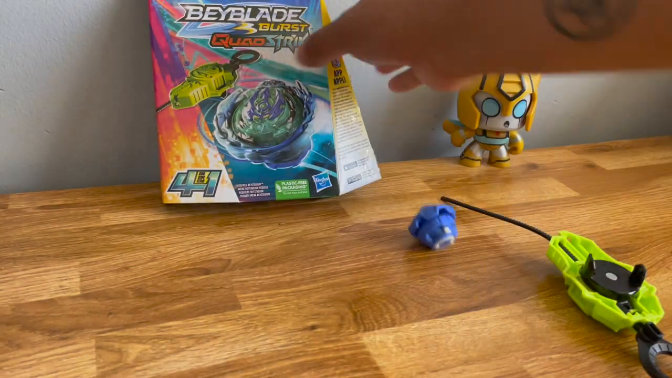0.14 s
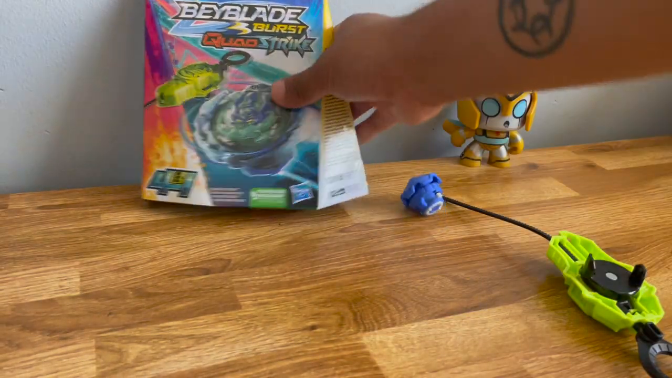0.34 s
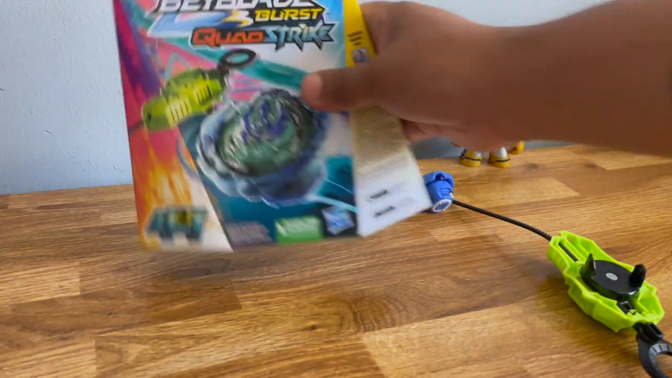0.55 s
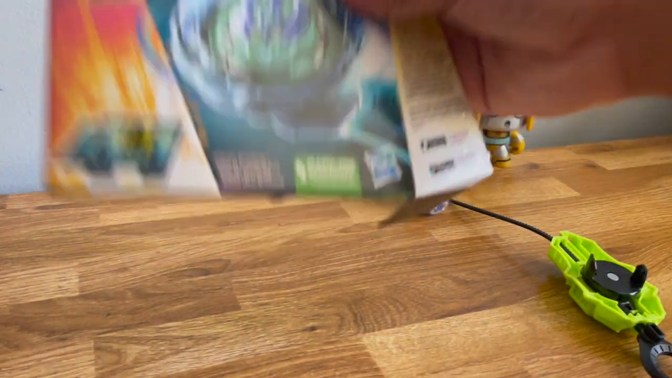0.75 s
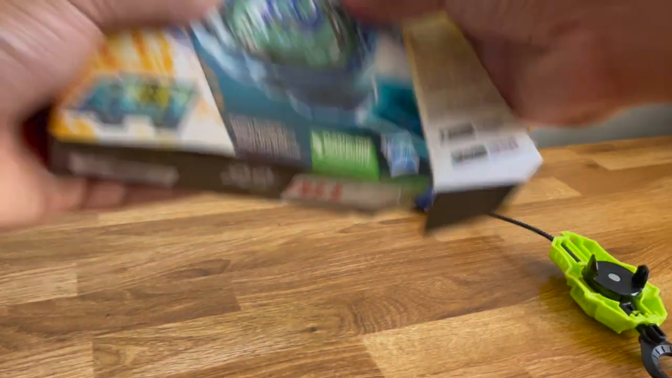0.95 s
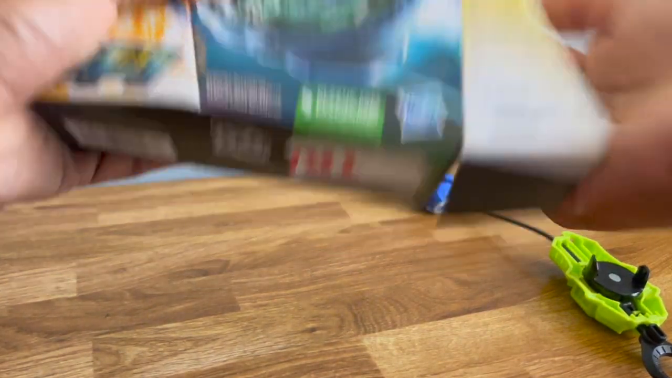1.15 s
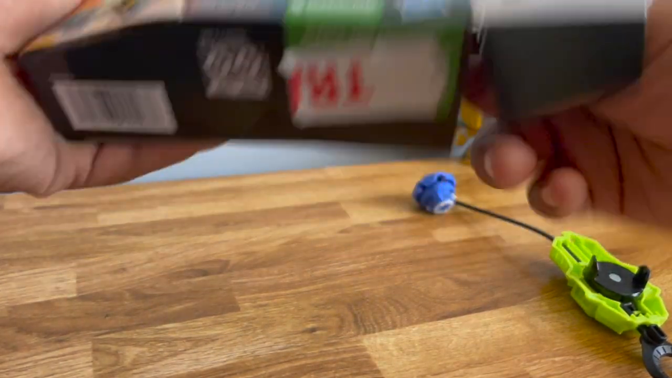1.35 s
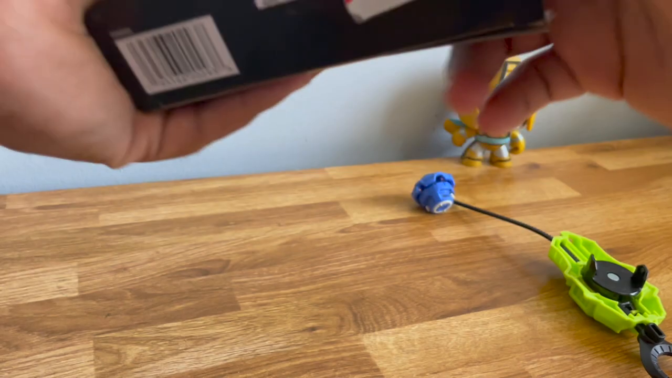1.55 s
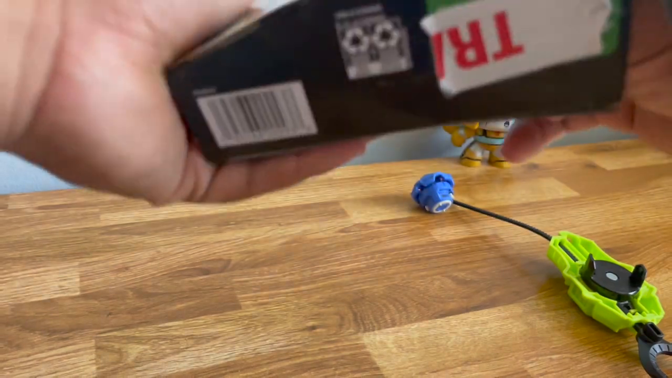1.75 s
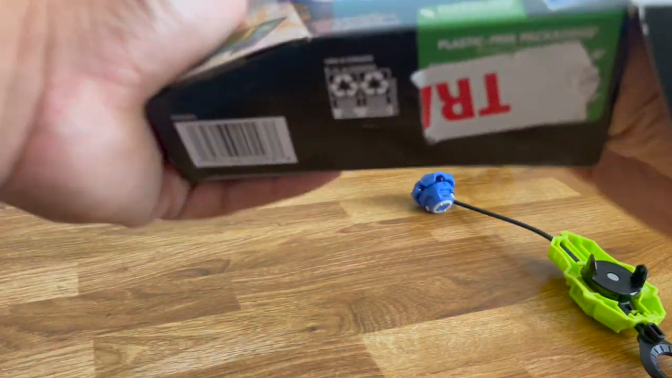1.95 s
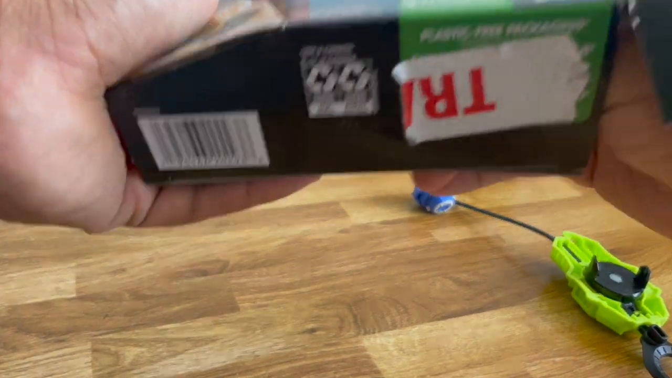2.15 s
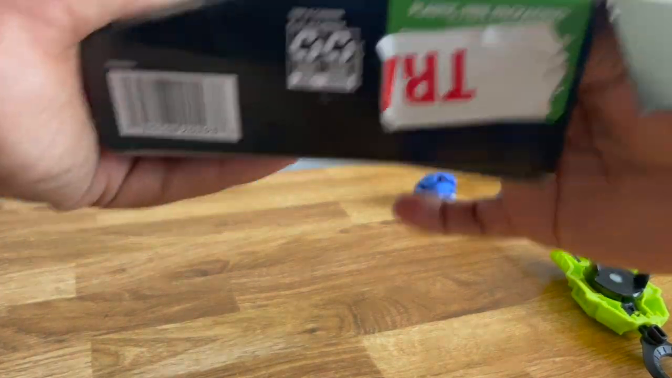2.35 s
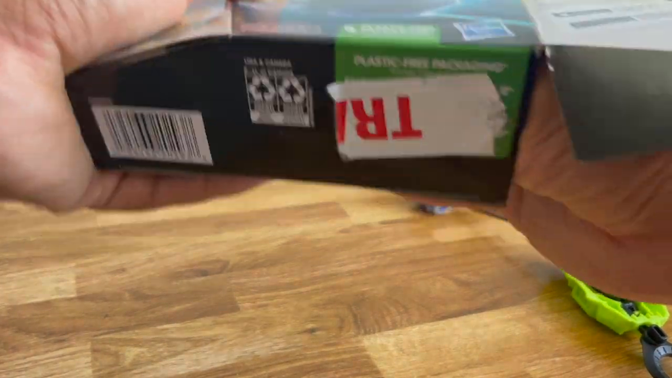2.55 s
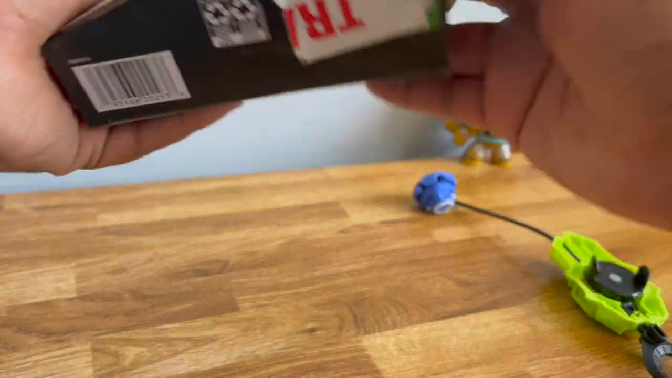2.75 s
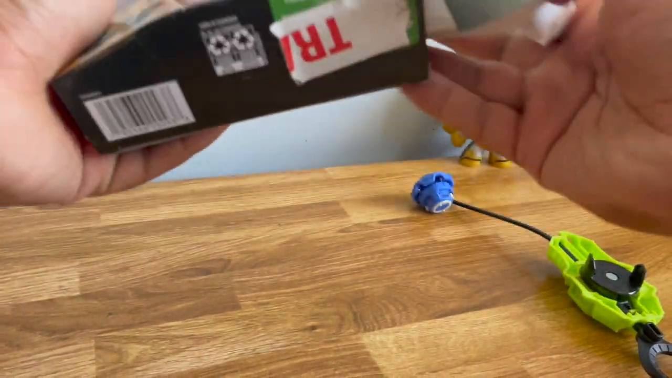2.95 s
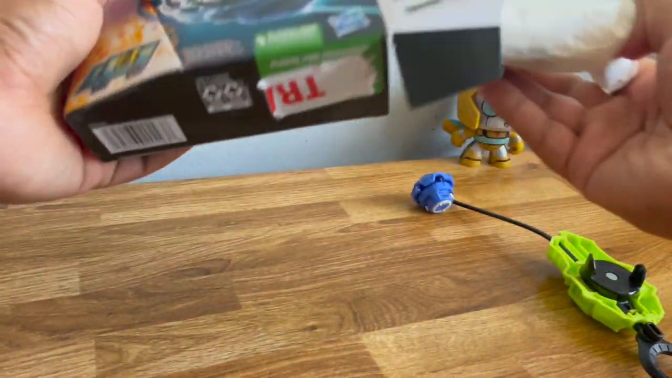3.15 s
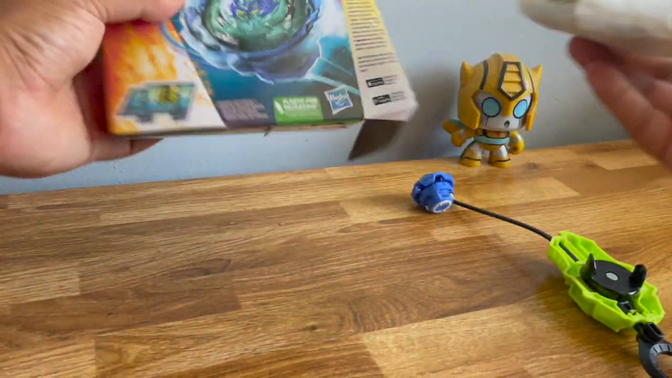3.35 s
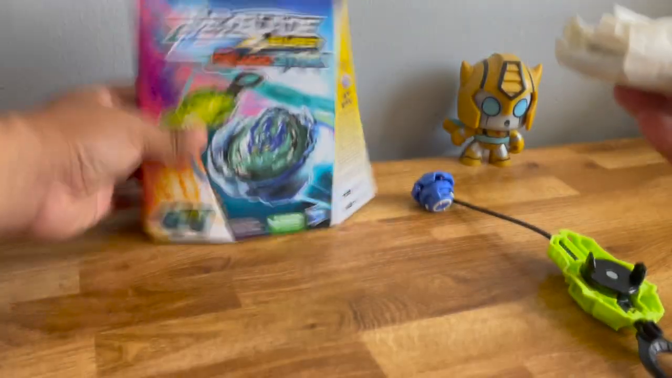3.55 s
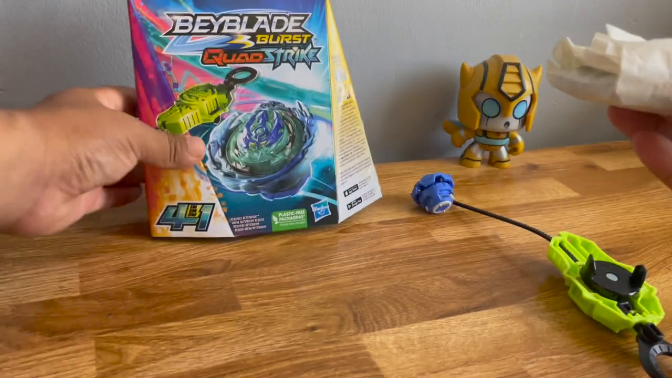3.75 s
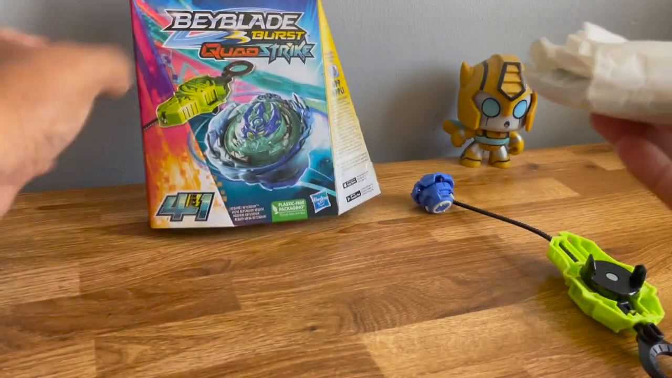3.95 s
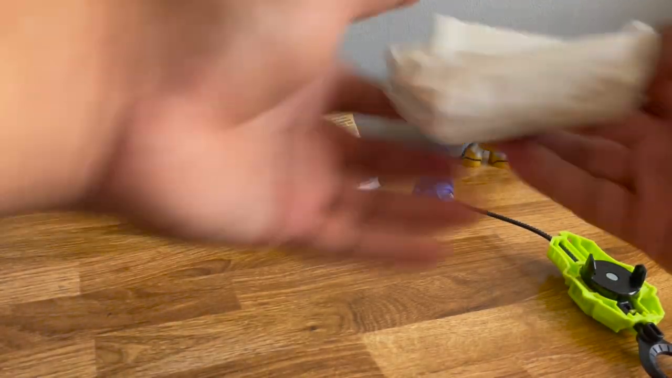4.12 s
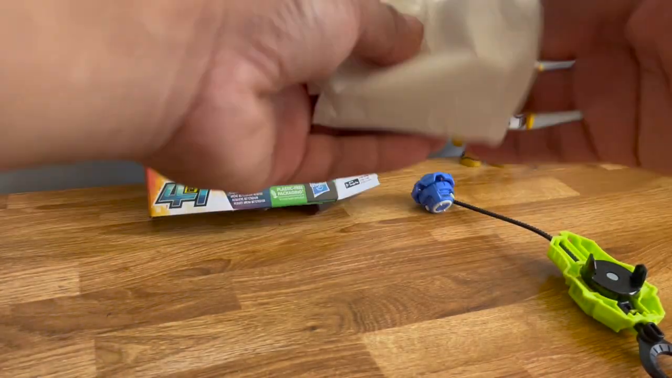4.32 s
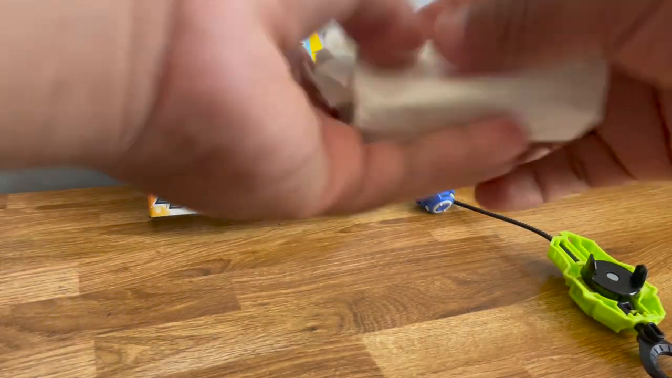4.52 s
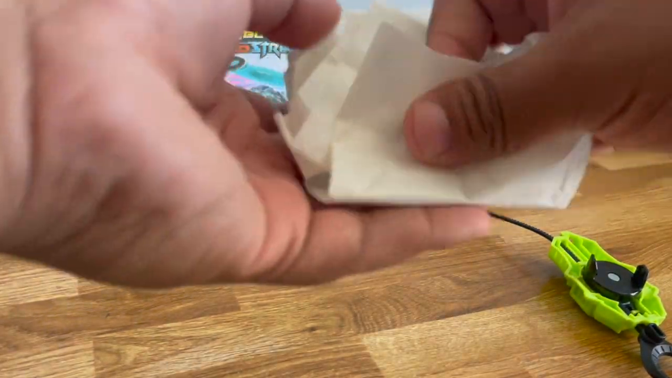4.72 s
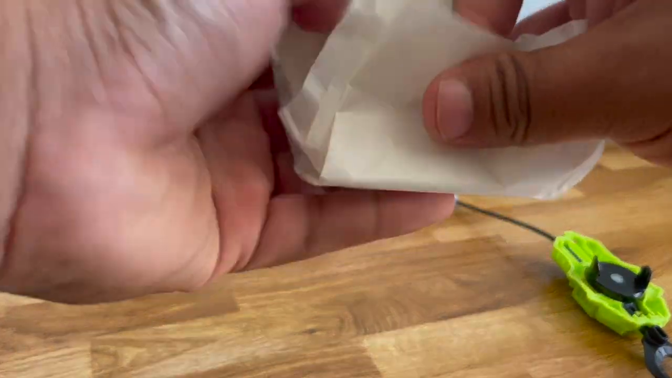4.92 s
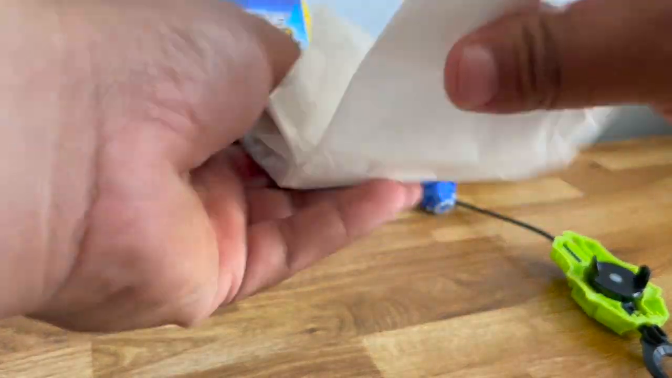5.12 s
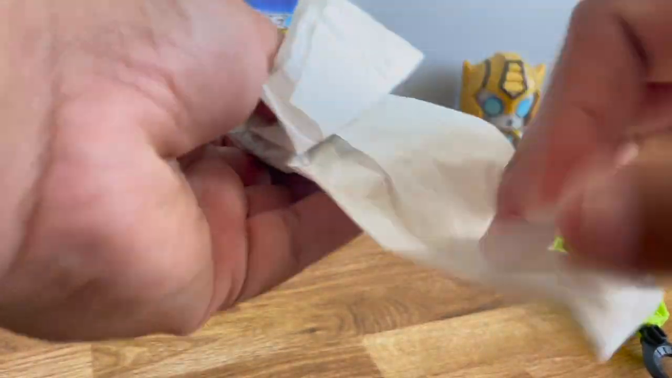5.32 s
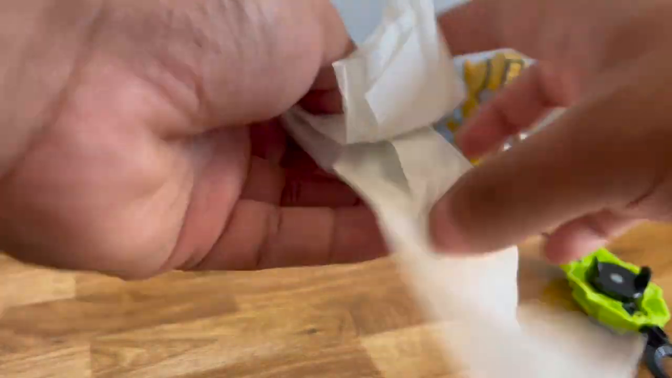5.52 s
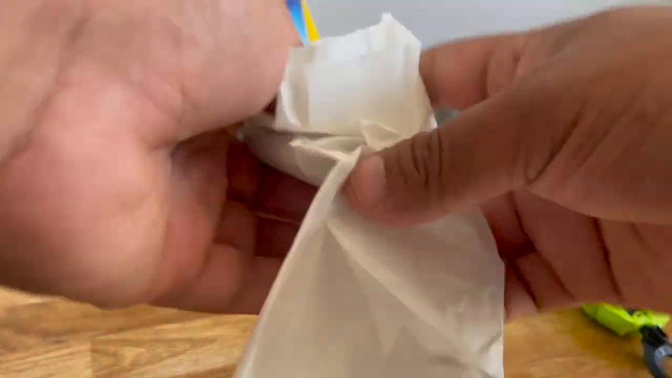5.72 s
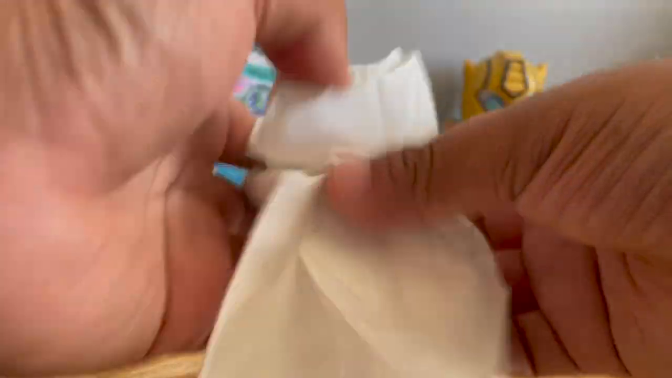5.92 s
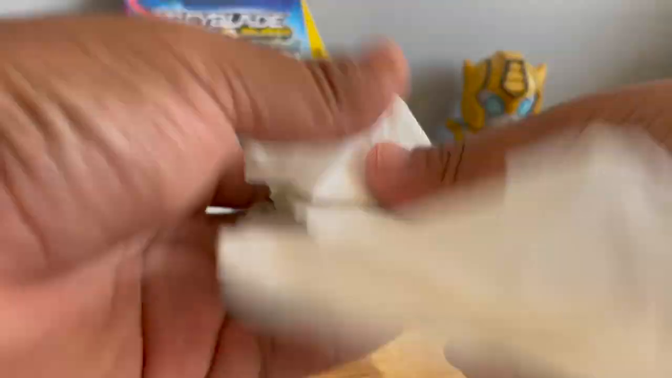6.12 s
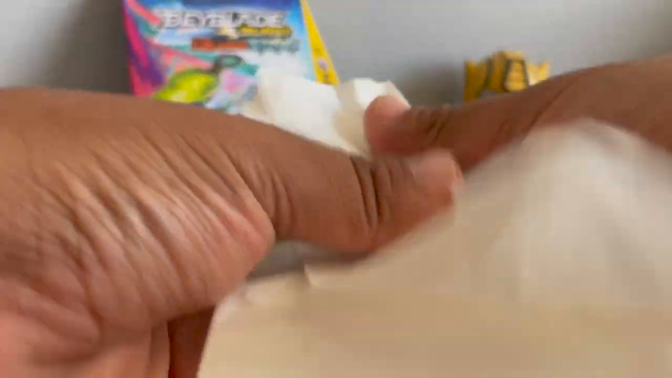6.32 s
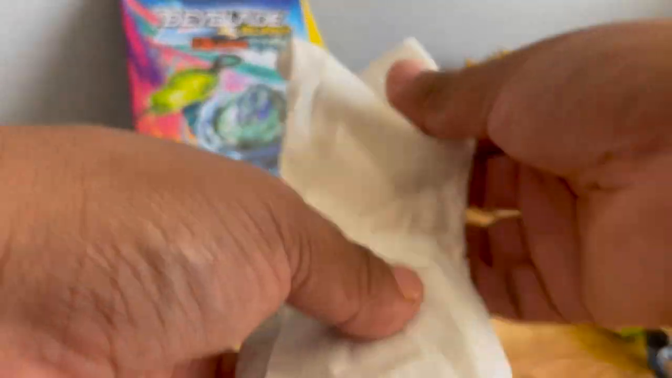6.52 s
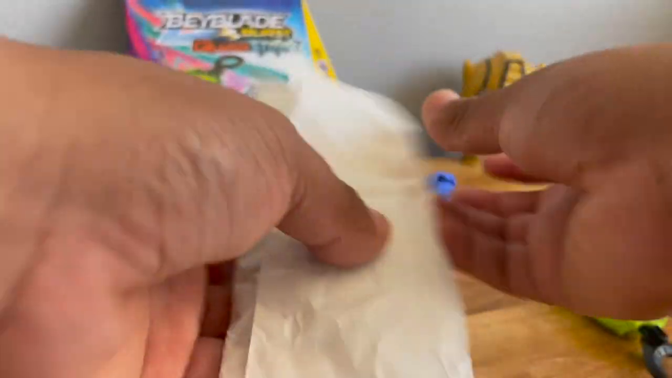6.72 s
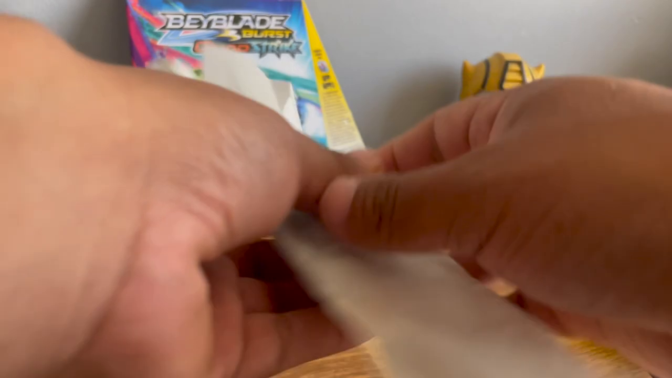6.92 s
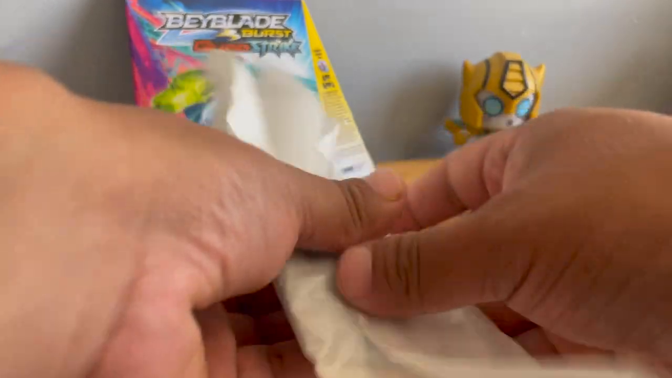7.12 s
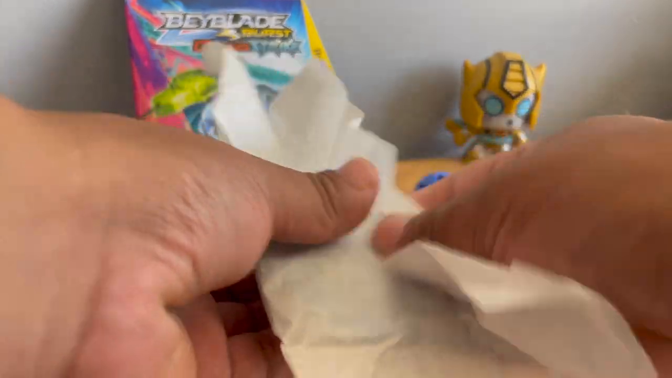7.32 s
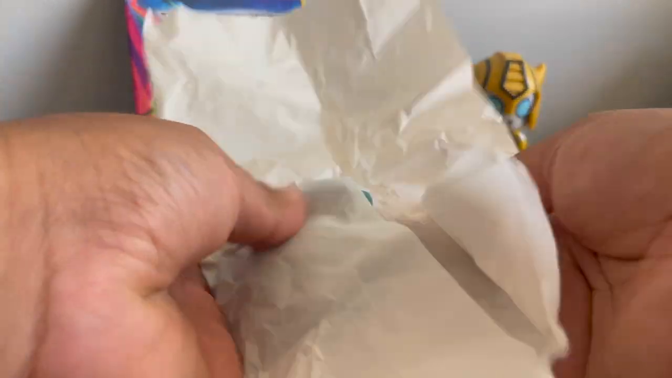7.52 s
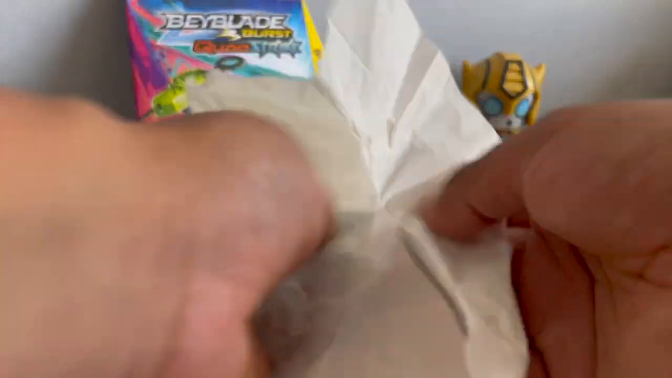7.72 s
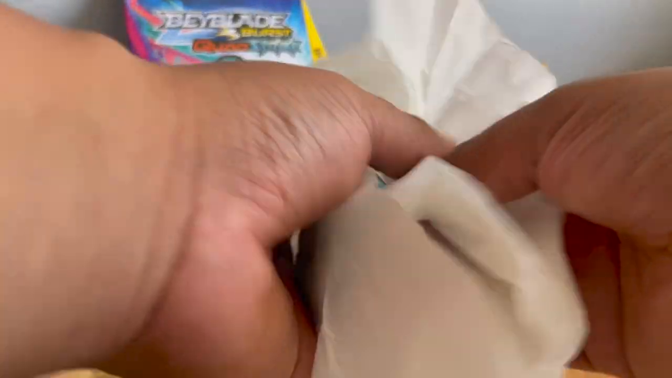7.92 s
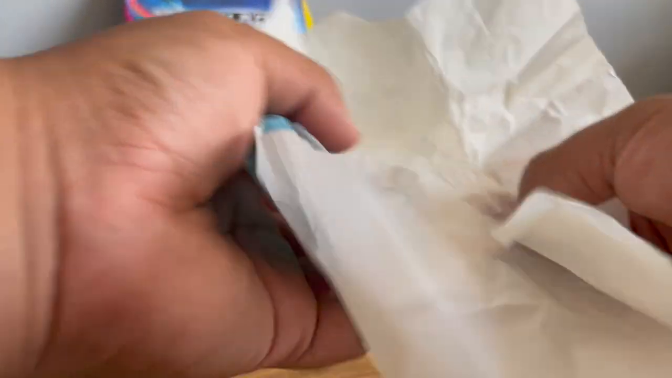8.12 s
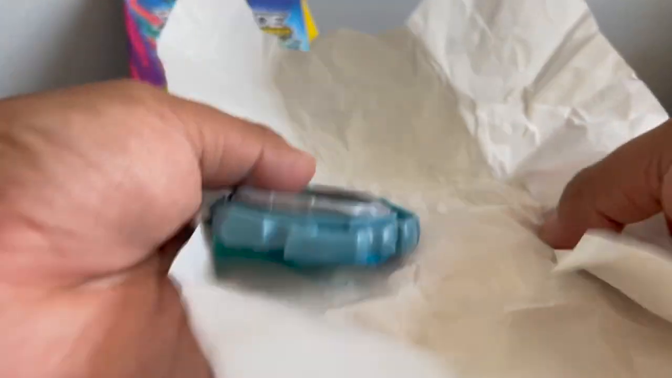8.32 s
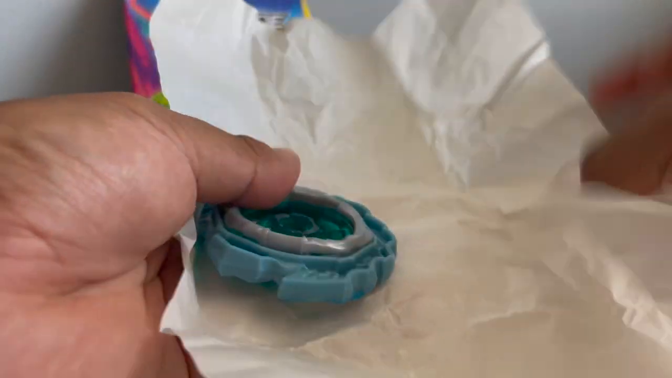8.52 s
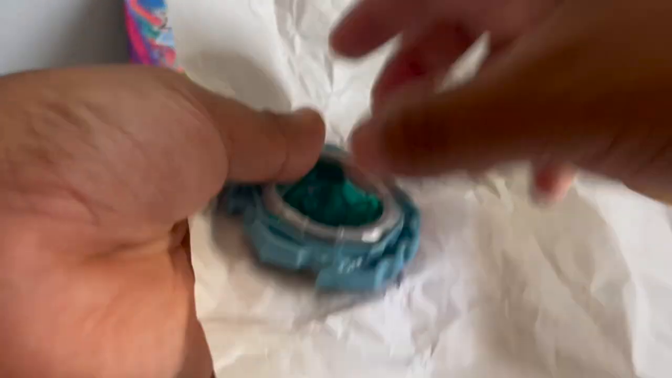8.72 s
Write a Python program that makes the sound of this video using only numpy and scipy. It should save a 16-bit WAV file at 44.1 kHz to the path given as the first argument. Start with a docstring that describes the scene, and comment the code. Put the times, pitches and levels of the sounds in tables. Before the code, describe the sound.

A light plastic rattle with a few bumps dies away, followed by boxy knocks and papery scuffing as a cardboard box is lifted and emptied. The box lands softly on the table. Then tissue paper is opened right by the stereo phone microphone: bright crackles, sharp snaps and soft low flaps, loudest past the middle of the unwrapping. The room is small and dry, with gaps falling almost silent.

```python
"""Close to a phone in a small room a plastic top wobbles to rest; then hands lift a cardboard box, shake out
a parcel, set the box down on a wooden table and unwrap tissue paper. Buckling creases are random impulses
that excite narrow bands over a noise rub; loud snaps are filtered clicks, knocks are decaying modes under a
rattle, flaps are damped low sines. Two microphone ports colour left and right over a faint room tone, and
the phone's gate turns faint sound down further."""
import sys
import numpy as np
from scipy import signal
from scipy.fft import rfft, irfft, next_fast_len
from scipy.io import wavfile
from scipy.ndimage import uniform_filter1d

SR = 44100
rng = np.random.default_rng(int(sys.argv[2]) if len(sys.argv) > 2 else 0)


def wav_out(sig):
    """Save sig, one row per channel (or a flat mono array), as 16-bit PCM at SR to the path in sys.argv[1]."""
    wavfile.write(sys.argv[1], SR, np.round(np.clip(np.atleast_2d(sig).T, -1, 1) * 32767).astype(np.int16))


def makeup_ratio(level_db):
    """Linear amplitude ratio for a level in decibels (20 dB per factor of ten)."""
    decades = np.asarray(level_db, float) / 20
    return 10 ** decades


N = 390726

# time in which the open box is held: start_s, end_s
BOX_HELD_S = (.84, 3.12)
# delay of a crease's reflection off a hand, fold or the table: shortest_s, longest_s
BOUNCE_S = (.0003, .0013)
BOUNCE = 0.7  # amplitude share of that reflection


def evened(x):
    """Normalization: scales a signal to rms 1."""
    return x / np.sqrt(np.mean(x ** 2) + 1e-20)


def read(points, hz):
    """Logarithmic frequency scale: interpolates a spectrum between its points."""
    f, value = np.transpose(points)
    return np.interp(np.log(hz + 1), np.log(f + 1), value)


def add(mix, s, sound):
    """Superposition: mixes a sound in at time s."""
    part = mix[:, round(s * SR):][:, :sound.shape[1]]
    part += sound[:, :part.shape[1]]


def band(x, hz, spread):
    """Resonance as a band-pass from hz / spread to hz * spread."""
    edges = np.clip([hz / spread, hz * spread], 20, SR / 2 - 500)
    return signal.sosfilt(signal.butter(2, edges, "bandpass", fs=SR, output="sos"), x)


def fade(x, seconds):
    """Exponential decay: every impulse dies away with this time constant."""
    return signal.lfilter([1], [1, -np.exp(-1 / (seconds * SR))], x)


def drift(count, size):
    """Smoothed noise: a random curve of rms 1 that wanders over about size samples."""
    return evened(uniform_filter1d(uniform_filter1d(rng.standard_normal(count), size), size))


def hands(t, fall_db_per_s):
    """Power summation: the moves add up, and the strongest dominates low weight and hollow pitch."""
    # moves of the hands or rolls of the top; levels are relative to the paper's spectrum, and the hollow
    # lies between hands and sheet: start_s, length_s, start_db, end_db, low_weight_db, hollow_hz
    moves = [(0, .28, -39.5, -44.5, -5, 1985), (0.306, 0.13, -43, -48.5, -5, 1420),
             (0.481, 0.015, -57.5, -50, -9, 1880), (0.556, .025, -66, -60, -27, 3100),
             (0.597, 0.024, -42, -61.5, -10, 2990), (0.875, 0.013, -37, -55.5, -19, 1540),
             (0.925, 0.2, -36.5, -63, -8, 1530), (1.055, .19, -42.5, -48, -23, 1300),
             (1.258, 0.024, -46, -57, 7, 1500), (1.283, 0.07, -37.5, -39, -11, 2900),
             (1.332, .19, -40.5, -39, -8.5, 1460), (1.538, 0.071, -51.5, -41, 0, 1490),
             (1.62, 0.1, -31, -48.5, -10.5, 1410), (1.736, 0.04, -51, -43, -14, 1500),
             (1.783, 0.1, -35, -31.5, -17.5, 1400), (1.931, 0.14, -43.5, -48.5, -28, 1490),
             (2.059, 0.15, -32.5, -41, -22, 1390), (2.251, 0.046, -34, -32, -14.5, 1510),
             (2.355, .16, -34, -36.5, -22.5, 1450), (2.577, .22, -37.5, -29.5, -27.5, 1534),
             (2.814, 0.13, -36, -48, -12, 3300), (2.947, 0.12, -30.5, -40.5, -19, 2230),
             (3.15, 0.051, -59, -46, -10.5, 2370), (3.39, 0.19, -59.5, -79, -16.5, 2560),
             (3.571, .12, -37.5, -54.5, 8, 1280), (3.871, 0.07, -62.5, -51, -59, 2190),
             (4.004, 0.14, -55.5, -42.5, -30, 2230), (4.153, 0.2315, -37, -31, -18, 2065),
             (4.425, 0.075, -31, -41, -21, 1970), (4.516, 0.12, -33, -27.5, -23, 1830),
             (4.668, 0.16, -34, -35.5, -25, 1860), (4.867, 0.1, -36.5, -36, -25.5, 1590),
             (5.006, 0.12, -30, -43, -32, 3150), (5.161, 0.08, -34, -37, -11, 2580),
             (5.278, 0.12, -27, -40, -15, 1750), (5.394, 0.13, -40, -34.5, -13, 2880),
             (5.557, 0.1, -31, -36.5, -28, 1770), (5.683, 0.11, -33.5, -29.5, -22, 1630),
             (5.851, 0.23, -34, -29, -31.5, 4380), (6.136, .18, -38, -32, -31.5, 3800),
             (6.392, 0.11, -29, -32, -23, 1440), (6.494, 0.18, -27.5, -31.5, -20, 2640),
             (6.699, 0.09, -38, -53, -32, 1410), (6.815, 0.028, -43.5, -41.5, -37, 4030),
             (6.915, 0.031, -31.5, -30.5, -35, 4500), (7.007, 0.047, -51.5, -31, -30, 2160),
             (7.097, 0.063, -23, -31, -22, 2110), (7.204, 0.13, -32.5, -28, -17.5, 2250),
             (7.358, 0.094, -28.5, -27, -27, 2670), (7.495, 0.12, -28.5, -37, -13.5, 1350),
             (7.669, 0.12, -36.5, -34, -20.5, 1320), (7.799, 0.12, -35.5, -29, -17.5, 2740),
             (7.971, 0.077, -36.5, -49, 0, 1250), (8.111, .11, -41.5, -46, -5, 1380),
             (8.225, 0.022, -45.5, -25.5, -22.5, 3170), (8.301, 0.035, -27, -27.5, -21.5, 3300),
             (8.412, 0.0097, -21, -44, -30.5, 5010), (8.437, 0.03, -42.5, -49, 7, 1400),
             (8.483, 0.045, -42, -47, -20, 5730), (8.522, 0.053, -58, -52, -4, 1420),
             (8.643, 0.024, -34.5, -49.5, -60, 4870), (8.743, 0.064, -47.5, -30.5, -9, 1390),
             (8.801, 0.067, -47.5, -31.5, -23, 1380)]
    rise_db_per_s, still_db = 904, -86
    s, length, start_db, end_db, low_db, hollow_hz = np.transpose(moves)[:, :, None]
    progress = np.clip((t - s) / np.maximum(length, 1e-3), 0, 1)
    db = start_db + (end_db - start_db) * progress
    db = db - rise_db_per_s * np.maximum(s - t, 0)
    db = db - fall_db_per_s * np.maximum(t - s - length, 0)
    power = makeup_ratio(2 * db) + 1e-30
    share = power / power.sum(0)
    level_db = 10 * np.log10(power.sum(0) + makeup_ratio(2 * still_db))
    return level_db, (share * low_db).sum(0), np.exp((share * np.log(hollow_hz)).sum(0))


def crinkle():
    """Impulsive excitation: random buckling creases ping and burst in each band over a steady rub."""
    # spectrum of paper and skin: frequency_hz, level_db
    paper = [(60, -10.5), (130, -13.5), (300, -7), (900, -4), (2000, -11.5), (5000, -9), (8000, -1),
             (11000, -1.5), (14500, -10)]
    # colour the open box adds while it is held: frequency_hz, gain_db
    in_box = [(100, -3), (400, 3.5), (620, 4), (1100, -7.5), (1550, -4.5), (2100, 0), (3000, 0.5),
              (6000, -2.5), (12000, -2.5)]
    # treble level against the move, fully applied from 11 kHz up: time_s, gain_db
    treble = [(0, -6.5), (.4, -22), (.6, -28), (.9, -11.5), (1.7, -12.5), (2.2, -11), (2.75, -4),
              (3.2, -15), (3.3, -33), (3.6, -24.5), (3.95, -30), (4.2, -8), (5.9, -7), (6.5, -8.5),
              (6.85, -13.5), (7.2, -7), (8.1, -9.5), (8.86, -7.5)]
    # anchors of lows, low middle, middle, upper middle and treble: frequency_hz
    parts_hz = [250, 900, 2000, 5500, 11000]
    creases_per_s, size_db, drift_db = 350, 4.5, -0.5
    card_softness = 0.7  # contacts of top and cardboard differ less in size than tissue
    colour_db, burst_focus_db, ping_focus_db = 5, 7, 18  # focus is the loss at one octave off
    ping_db, rub_db, fold_spread_db = 1, -2.5, 2.5
    faint_db, narrowing = -45.5, 0.58  # each dB under faint_db costs this many dB away from the hollow
    echo_db, echo_orders = 4, 2.6  # a near surface lifts multiples of the hollow pitch, dips between

    t = np.arange(N) / SR
    s = np.arange(0, N / SR + .004, .004)  # control times
    effort_db, _, hollow_hz = hands(s, fall_db_per_s=543.5)
    linger_db, low_db, _ = hands(s, fall_db_per_s=300)  # the lows outlast the rest
    thump_db = low_db + linger_db - effort_db
    level = 0 * s
    parts_db = np.array([thump_db, 0.45 * thump_db, level, level, np.interp(s, *np.transpose(treble))])
    faint_loss_db = narrowing * np.clip(faint_db - effort_db, 0, 25)

    wander_db = drift_db * drift(count=N, size=400)
    size = np.minimum(rng.exponential(1, N), 2.4)
    softness = np.where(t < BOX_HELD_S[1], card_softness, 1)
    creases = (rng.random(N) < creases_per_s / SR) * makeup_ratio((size_db * size + wander_db) * softness)
    at = np.flatnonzero(creases)
    # long creases sound low, short ones high
    centre_hz = 2500 * 2 ** (1.57 * rng.standard_normal(len(at)))
    flips = rng.choice([-1., 1.], (2, len(at)))
    delay = (rng.uniform(*BOUNCE_S, len(at)) * SR).astype(int)
    again = np.minimum(at + delay, N - 1)
    rub = makeup_ratio(rub_db + 0.99 * wander_db)

    out = np.zeros((2, N))
    patches = drift(count=len(s), size=6)
    for hz in np.geomspace(65, 15000, num=32):
        off = np.minimum(np.log2(hz / centre_hz) ** 2, 4.)
        coloured = creases.copy()
        variation = rng.standard_normal(size=8192)[at % 8192]
        coloured[at] *= makeup_ratio(colour_db * variation - burst_focus_db * off)
        burst = evened(fade(coloured, 0.0022 + 0.088 / hz))  # low bands ring longer
        drive = rng.standard_normal((2, N)) * np.hypot(burst, rub)
        pings = creases[at] * makeup_ratio(-ping_focus_db * off)
        pings = makeup_ratio(ping_db) * flips * pings * np.sqrt(N / np.sum(pings ** 2))
        drive[:, at] += pings
        drive[:, again] += BOUNCE * pings
        noise = band(drive, hz, 1.08)

        # folds shift the colour, alike in neighbouring bands
        patches = evened(patches + 0.88 * drift(count=len(s), size=6))
        fold_db = fold_spread_db * (0.48 + 120 / hz) * patches
        weights = [np.interp(np.log(hz), np.log(parts_hz), pick) for pick in np.eye(len(parts_hz))]
        tilt_db = weights @ parts_db
        near = np.exp(-(np.log2(hz / hollow_hz) / 0.45) ** 2)
        hollow_db = -faint_loss_db * (1 - near) * (hz > parts_hz[1])
        order = hz / hollow_hz
        comb_db = echo_db * np.cos(2 * np.pi * order) * np.exp(-(order / echo_orders) ** 4)
        box_db = ((s > BOX_HELD_S[0]) & (s < BOX_HELD_S[1])) * read(in_box, hz)
        gain_db = read(paper, hz) + box_db + effort_db + tilt_db + hollow_db + comb_db + fold_db
        out += evened(noise) * np.interp(t, s, makeup_ratio(gain_db))
    return out


def snap(db, hz):
    """Snap-through buckling: a click and its bounce ring the sheet, with a short crackle after."""
    t = np.arange(1500) / SR
    envelope = np.exp(-t / 0.00045) + 0.13 * np.exp(-t / 0.0039)
    drive = 1.26 * rng.standard_normal((2, len(t))) * envelope
    drive[:, 0] = 3, -3
    drive = drive + BOUNCE * np.roll(drive, round(rng.uniform(*BOUNCE_S) * SR), axis=1)
    crack = makeup_ratio(1.0) * band(drive, 2200, 2.22) + makeup_ratio(-7.0) * band(drive, 7500, 1.26)
    spread = 1.13 + .9 * makeup_ratio(.5 * db)  # harder snaps spread wider
    ring = band(band(drive, hz, spread), hz, spread) + makeup_ratio(0.35 * db - 1.5) * crack
    return makeup_ratio(db) * ring / abs(ring[0]).max()


def crease_snaps(paths):
    """Superposition: adds the loud single snaps of creases."""
    # level is the direct peak ahead of the ports: time_s, level_db, ring_hz
    snaps = [(0.9248, -20, 1660), (1.1164, -28, 1940), (1.2835, -22, 2850), (1.293, -20, 2800),
             (1.5988, -24, 1360), (1.6182, -19, 1190), (1.709, -20, 1390), (1.7888, -22, 1440),
             (1.8123, -22, 1400), (1.8444, -21, 1510), (1.8637, -19, 1480), (1.9111, -22, 1540),
             (2.0193, -23, 1520), (2.1126, -25, 1450), (2.134, -24, 1450), (2.2623, -17, 1290),
             (2.2762, -12, 1500), (2.378, -22, 1660), (2.4004, -19, 1550), (2.604, -23, 1510),
             (2.6828, -22, 3320), (2.7656, -19, 1630), (2.7906, -16, 3410), (2.823, -19, 1660),
             (2.8584, -26, 1530), (2.9307, -24, 3250), (2.9422, -18, 2830), (2.9662, -21, 1600),
             (2.9951, -21, 2230), (3.0734, -24, 1700), (3.1358, -28, 2220), (3.2979, -44, 2200),
             (3.3847, -45, 2710), (3.5753, -22, 1200), (3.8621, -52, 1940), (3.932, -44, 1960),
             (4.0203, -38, 2070), (4.0632, -30, 902), (4.2896, -18, 2030), (4.3201, -16, 3270),
             (4.3425, -16, 2030), (4.377, -17, 3360), (4.4303, -15, 1370), (4.5595, -15, 1650),
             (4.5979, -13, 2170), (4.6184, -13, 2070), (4.6329, -8, 1990), (4.6853, -17, 3250),
             (4.7895, -19, 1530), (5.0374, -19, 4530), (5.0873, -20, 5250), (5.1662, -17, 2850),
             (5.1776, -16, 5990), (5.1924, -16, 1380), (5.25, -16, 3400), (5.2799, -16, 1800),
             (5.4545, -16, 4080), (5.5623, -17, 2090), (5.6585, -16, 2800), (5.7014, -12, 1550),
             (5.7638, -18, 1780), (5.8721, -16, 5730), (5.8945, -12, 1300), (5.9269, -15, 4940),
             (5.9623, -14, 4930), (5.9978, -15, 1340), (6.0187, -15, 4970), (6.0541, -13, 5250),
             (6.2447, -19, 4570), (6.3704, -8, 1350), (6.4278, -12, 3490), (6.4882, -17, 1430),
             (6.5011, -11, 1330), (6.5555, -7, 3660), (6.5864, -12, 1660), (6.6174, -12, 3880),
             (6.6967, -10, 2680), (6.7416, -20, 1350), (6.779, -28, 2160), (6.8209, -13, 6800),
             (6.9296, -13, 4640), (7.0499, -17, 2080), (7.0753, -16, 1400), (7.1013, -10, 2130),
             (7.1501, -8, 2190), (7.1985, -12, 3000), (7.218, -13, 2070), (7.2264, -14, 3550),
             (7.2449, -14, 2230), (7.2594, -13, 3570), (7.2759, -13, 6190), (7.2953, -13, 1100),
             (7.3457, -13, 2960), (7.3881, -9, 2260), (7.4515, -15, 5040), (7.5098, -10, 2240),
             (7.5173, -9, 3770), (7.5443, -16, 6060), (7.5617, -12, 3310), (7.6071, -13, 1360),
             (7.6281, -14, 3000), (7.661, -13, 1070), (7.7154, -15, 2290), (7.8047, -15, 5270),
             (7.8326, -13, 6560), (7.8446, -14, 3580), (7.8554, -13, 4030), (7.8775, -15, 3660),
             (7.9179, -11, 2760), (7.9414, -18, 3400), (7.9803, -12, 1230), (7.9917, -10, 3750),
             (8.0107, -18, 1020), (8.0561, -29, 1300), (8.0925, -25, 902), (8.1204, -22, 1020),
             (8.1628, -25, 1380), (8.1833, -25, 7070), (8.2167, -19, 4920), (8.2841, -20, 3480),
             (8.2955, -14, 2690), (8.3105, -11, 4770), (8.331, -24, 6030), (8.331, -9, 2840),
             (8.3619, -19, 5000), (8.4013, -14, 5230), (8.4492, -23, 1480), (8.4821, -18, 6010),
             (8.4936, -17, 5210), (8.5076, -20, 5750), (8.6123, -32, 6360), (8.6268, -24, 4920),
             (8.7186, -30, 7250), (8.7296, -25, 1370), (8.7964, -17, 1370)]
    for s, *row in snaps:
        add(paths, s, snap(*row))


def flap(db, hz):
    """Damped oscillation: a soft push of air rings a few low cycles."""
    rise_s, decay_cycles = 0.001, 1.87
    t = np.arange(3000) / SR
    shape = (1 - np.exp(-t / rise_s)) * np.exp(-t * hz / decay_cycles)
    push = shape * np.sin(2 * np.pi * (hz * t + rng.random((2, 1))))
    return makeup_ratio(db) * push / shape.max()


def flaps(paths):
    """Air displacement: adds each push of the sheet or a palm."""
    # level is the envelope peak ahead of the ports: time_s, level_db, pitch_hz
    pushes = [(4.35, -31, 358), (4.555, -32, 356), (4.613, -29.5, 374), (4.926, -35.5, 355),
              (5.06, -32.5, 310), (5.141, -38.5, 330), (5.163, -42, 400), (5.25, -36, 346),
              (5.471, -36, 348), (5.959, -31, 350), (6.055, -30, 393), (6.27, -30, 343),
              (6.491, -33.5, 251), (6.601, -35, 466), (7.241, -32, 347), (7.51, -44, 312),
              (7.773, -40, 386), (8.195, -34, 360), (8.77, -32, 479)]
    for s, *row in pushes:
        add(paths, s, flap(*row))


def open_box(paths):
    """Cavity resonance: the mouth of the open box rings with the rustle while it is held."""
    # resonance of the mouth: frequency_hz, spread_factor, gain_db
    mouth = (1546, 1.17, 0)
    lift, drop = (round(s * SR) for s in BOX_HELD_S)
    hz, spread, gain_db = mouth
    add(paths, BOX_HELD_S[0], makeup_ratio(gain_db) * band(paths[:, lift:drop], hz, spread))


def ring_of(modes, hard_db, held):
    """Modal decay: harder contacts favour modes above 500 Hz, and hands shorten every ring."""
    t = np.arange(16000) / SR
    ring = np.zeros(len(t))
    for hz, db, t60 in modes:
        decay_db = db + hard_db * np.log2(hz / 500) - 60 * t / (t60 * held)
        ring += makeup_ratio(decay_db) * np.sin(2 * np.pi * hz * t)
    return ring


def knock(modes, db, hard_db, rattle, held):
    """Convolution: a short rattle of contacts excites the modes of a hollow body."""
    drive = rng.standard_normal((2, 3000)) * np.exp(-np.arange(3000) / SR / rattle)
    # each knock rings the modes at slightly other pitches and levels
    deviation = [[.012 * hz, 3, 0] for hz, _, _ in modes]
    struck = modes + rng.standard_normal((len(modes), 3)) * deviation
    hollow = signal.fftconvolve(drive, ring_of(struck, hard_db, held)[None], axes=1)
    return makeup_ratio(db) * hollow / abs(hollow[0]).max()


def box_knocks(paths):
    """Modal excitation: adds the hollow knocks on the cardboard box."""
    # level is the direct peak ahead of the ports; share is of the free decay time left by the hands:
    # time_s, level_db, hardness_db_per_octave, rattle_s, ring_share
    knocks = [(0.923, -17, 27, 0.0054, 0.16), (0.972, -29, 23.5, 0.004, 0.4),
              (1.06, -13.5, 2, 0.0056, 0.057), (1.334, -30, 10, 0.0035, 0.27),
              (2.265, -52, 9, 0.0037, 0.25), (3.204, -38.5, -2, 0.011, 0.43),
              (3.4, -45.5, 14, 0.0049, 0.74), (3.574, -15.5, -6.5, 0.035, 0.35),
              (3.609, -17, -12, 0.0045, 0.54), (4.068, -31.5, 5, 0.036, 0.48)]
    # modes of the free box, relative levels: frequency_hz, level_db, t60_s
    box = [(133, -18.5, 0.46), (274, -20, 0.16), (374, 1.5, 0.16), (544, 6, 0.018), (624, -3, 0.091),
           (770, -31, 0.27), (848, -27.5, 0.4), (1235, -26, 0.034)]
    for s, *row in knocks:
        add(paths, s, knock(box, *row))


def wobbling_top(paths):
    """Contact excitation: rolling rings the plastic top, and it bumps the table as it comes to rest."""
    # modes of the free top, relative levels: frequency_hz, level_db, t60_s
    top = [(371, -24, .1), (665, -11, 0.16), (1025, -16, 0.05), (1920, -15, 0.07), (2160, -18, 0.04),
           (2790, -25, 0.1), (3750, -29, 0.06), (4613, -30, 0.16)]
    # level is the direct peak ahead of the ports; share is of the free decay time:
    # time_s, level_db, hardness_db_per_octave, rattle_s, ring_share
    bumps = [(0.015, -30, 6, 0.0023, 0.25), (0.06, -19, -2, 0.0044, 0.12), (0.075, -24, 2, 0.0079, 0.25),
             (0.149, -20, 1, 0.005, 0.22), (0.197, -21, -1, 0.006, .4), (0.426, -33.5, 1, 0.0055, 0.25),
             (0.477, -33, -1, 0.004, 0.3), (0.59, -36, 5, 0.014, 0.7)]
    rolling = paths[:, :round(BOX_HELD_S[0] * SR)]
    ring = ring_of(top, hard_db=0, held=0.25)
    add(paths, 0, makeup_ratio(-15) * signal.fftconvolve(rolling, ring[None] / np.linalg.norm(ring), axes=1))
    for s, *row in bumps:
        add(paths, s, knock(top, *row))


def ports(direct, stray):
    """Partial coherence: the right port hears a phase-turned copy of the left mixed with stray sound."""
    # phase by which the left leads: frequency_hz, phase_rad
    port_phase = [(0, 0), (1290, 0.1), (1640, 0.7), (2240, 0.3), (2840, 0.8), (4130, -0.0), (5170, 0.6),
                  (6800, -1.2), (7670, -2.9), (8870, -3.5), (10700, -6.1), (12700, -6.4), (13800, -9.3),
                  (16300, -9.6)]
    # left minus right: frequency_hz, balance_db
    port_balance = [(60, 2.5), (110, 3.0), (200, 4.0), (380, 4.0), (700, 5.5), (1290, 3.5), (2380, 5.0),
                    (4400, 5.5), (8120, 1.0), (15000, 0.0)]
    # amplitude share common to both ports: frequency_hz, likeness (0-1)
    port_likeness = [(100, 0.87), (500, 0.9), (2000, 0.91), (5000, 0.72), (7400, 0.86), (8300, 1),
                     (9300, 0.68), (14000, 1)]
    # response of both microphones: frequency_hz, gain_db
    microphone = [(25, -33), (55, -17), (100, -8), (140, -1.5), (12500, 1.5), (13600, -3), (14500, -15),
                  (16000, 10.5)]
    size = next_fast_len(N + 4096)
    hz = np.fft.rfftfreq(size, 1 / SR)
    same = np.clip(read(port_likeness, hz), 0, 1)
    turn = np.exp(.5j * read(port_phase, hz)) * makeup_ratio(read(port_balance, hz) / 2)
    colour = makeup_ratio(read(microphone, hz))
    left = rfft(direct, size)
    right = same * left + np.sqrt(1 - same ** 2) * rfft(stray, size)
    return irfft([left * turn * colour, right / turn * colour], size)[:, :N]


def lean_sideways(near):
    """Level-difference panning: follows the place where the hands work."""
    # left minus right: time_s, balance_db
    sideways = [(0, -2), (.7, 0), (1.3, -0.5), (1.7, -2), (3.2, -1), (3.6, 0.5), (4.2, -1), (5.5, 0),
                (7, 1), (8, 0), (8.86, -1.5)]
    lean = makeup_ratio(np.interp(np.arange(N) / SR, *np.transpose(sideways)) / 2)
    return near * [lean, 1 / lean]


def room(x):
    """Reverberation: sparse taps of random sign, each band dying at its own speed."""
    # decay of the room: frequency_hz, t60_s
    decay = [(100, 0.045), (500, 0.19), (2000, 0.18), (8000, 0.037)]
    taps = np.zeros((2, SR // 2))
    slots = np.arange(150, SR // 2 - 20, 20)
    at = slots + rng.integers(0, 20, (2, len(slots)))
    np.put_along_axis(taps, at, rng.choice([-1., 1.], at.shape), 1)
    hz, t, z = signal.stft(taps, SR, nperseg=256)
    tail = signal.istft(z * makeup_ratio(-60 * t / read(decay, hz)[:, None]), SR, nperseg=256)[1]
    return signal.fftconvolve(x, tail / np.linalg.norm(tail[0]), axes=1)[:, :N]


def hush():
    """Spectral shaping: filtered noise makes a faint low room tone."""
    # relative spectrum of the tone: frequency_hz, level_db
    spectrum = [(24, -60.5), (40, 11), (251, -9.5), (301, -0.5), (542, -0.5), (593, -22.5), (9000, -10),
                (11700, -50), (19800, -120)]
    shape = makeup_ratio(read(spectrum, np.fft.rfftfreq(N, 1 / SR)))
    tone = irfft(rfft(rng.standard_normal((2, N))) * shape, N)
    return makeup_ratio(-83.5) * evened(tone)


def scene():
    """Superposition: a direct and a stray path take every source, then pass the ports and the room."""
    paths = crinkle()
    open_box(paths)
    wobbling_top(paths)
    box_knocks(paths)
    crease_snaps(paths)
    flaps(paths)
    near = lean_sideways(ports(*paths))
    return near + makeup_ratio(-15.0) * room(near) + hush()


def low_pass(x):
    """Removes everything above the highest recorded frequency."""
    return signal.sosfilt(signal.butter(12, 16670, fs=SR, output="sos"), x)


def record(dry):
    """Downward expansion and soft limiting: faint time-frequency cells sink, peaks are rounded off."""
    threshold_db, ceiling = -97.0, 0.75
    z = signal.stft(dry, nperseg=512, noverlap=384)[2]
    power = (abs(z) ** 2).mean(0)
    power = uniform_filter1d(uniform_filter1d(power, size=9, axis=0), size=5, axis=1)
    under_db = np.clip(threshold_db - 10 * np.log10(power + 1e-20), 0, 25)
    gated = signal.istft(z * makeup_ratio(-.8 * under_db), nperseg=512, noverlap=384)[1][:, :N]
    limited = ceiling * np.tanh(gated / ceiling)
    return low_pass(limited)


dry = scene()
out = record(dry)
wav_out(out)
```